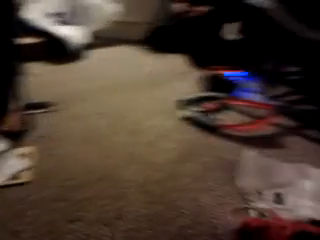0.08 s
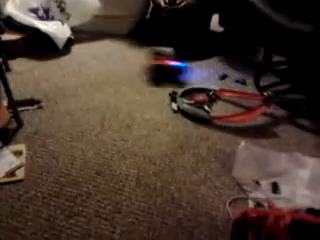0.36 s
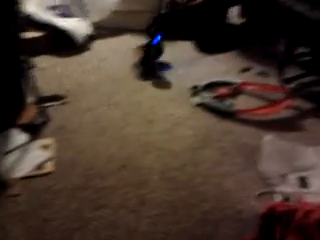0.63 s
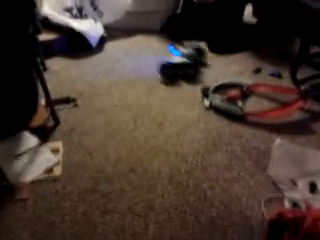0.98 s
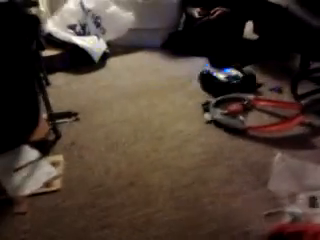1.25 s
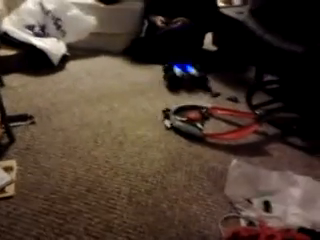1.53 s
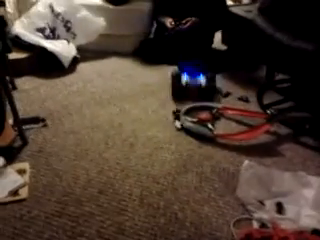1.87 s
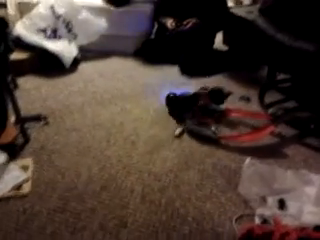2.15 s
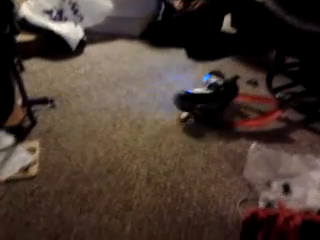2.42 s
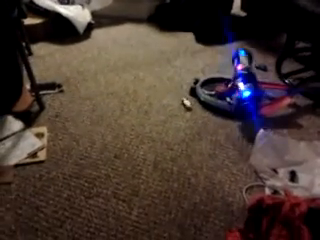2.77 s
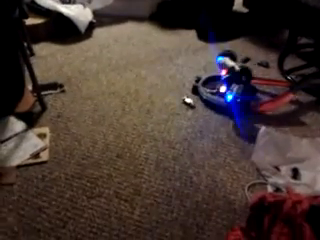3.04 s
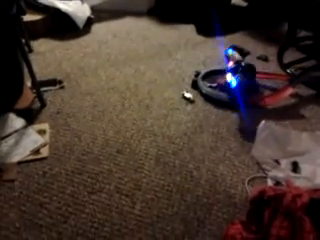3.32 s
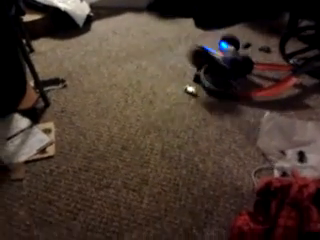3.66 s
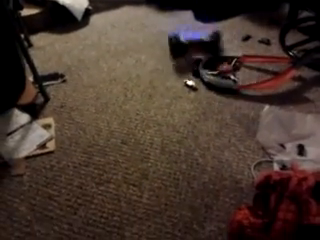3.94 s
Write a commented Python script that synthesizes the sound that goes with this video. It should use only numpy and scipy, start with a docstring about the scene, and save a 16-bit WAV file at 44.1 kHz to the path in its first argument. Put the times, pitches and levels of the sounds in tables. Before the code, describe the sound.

A toy car's motor whirs in bursts, then the car clatters against a bicycle part.

```python
"""A faint hum lies under a small room. A toy car darts about on the carpet, its motor whirring in
bursts: meshing plastic gears whine at their tooth rate, and teeth and loose parts drive the shell's
resonances. Now and then the wheels land with a thump. At 2.3 s the car strikes a bicycle part lying
on the floor and clatters over it, each impact setting the metal into damped free vibration.
To the end it keeps scrabbling against the part, with lighter clacks."""
import sys
import numpy as np
from scipy import signal
from scipy.fft import rfft, irfft
from scipy.io import wavfile
from scipy.ndimage import uniform_filter1d, minimum_filter1d

SR = 44100
rng = np.random.default_rng(int(sys.argv[2]) if len(sys.argv) > 2 else 0)


def persist_wave(psi):
    """Save psi, clipped to +-1, as 16-bit WAV."""
    counts = np.round(np.clip(psi, -1, 1) * 32767).astype(np.int16)
    wavfile.write(sys.argv[1], SR, np.atleast_2d(counts).T)


N = 176400

# Levels within each table are relative.
# spectrum of the room's air and hum: f/Hz, level/dB
AIR_SPECTRUM = [(20, -26), (46, -6), (57, 12.5), (70, -8), (195, 0), (300, -11), (1000, -12.5),
                (3000, -17.5), (15000, -35.5)]
# landings of the wheels on the carpet: t/s, level/dB
LANDINGS = [(.88, 1), (2.005, 2), (2.264, 2.5), (3.202, -1.5), (3.249, -6), (3.52, -3)]
# spectrum of a landing: f/Hz, level/dB
LANDING_SPECTRUM = [(50, -31), (160, 1), (260, -7.5), (370, 3), (550, -7.5), (850, 4), (1400, -17),
                    (4000, -61)]
# heavy blows of the car on the bicycle part: t/s, level/dB, chatter decay time/s
HEAVY_BLOWS = [(2.3115, 0, 0.0041), (2.318, -5.5, 0.0043), (2.3255, -6.5, 0.0048), (2.3305, -10.5, .006),
               (2.433, -14, 0.0034), (2.438, -2, 0.0059), (2.449, -3, 0.0032), (2.454, -4.5, 0.0043),
               (2.461, -4, 0.005), (2.566, -17, 0.0047), (2.573, -6.5, 0.017), (2.888, -23.5, 0.0064),
               (3.604, -20, 0.0072)]
# spectrum of a blow: f/Hz, level/dB
BLOW_SPECTRUM = [(80, -37.5), (362, -4.5), (497, -8.5), (758, 10.5), (1040, -2.5), (1180, 4.5), (2320, 5),
                 (3460, -10), (7730, -6.5), (15500, -30.5)]
# light clacks of plastic on metal: t/s, level/dB, chatter decay time/s
LIGHT_CLACKS = [(1.218, -15.5, 0.019), (2.378, 0, 0.031), (2.392, -1.5, 0.016), (2.707, -11.5, 0.017),
                (2.92, -8, 0.014), (3.03, -6, 0.017), (3.243, -7, 0.015), (3.266, -9.5, 0.0069),
                (3.324, -15.5, 0.028), (3.448, -8, 0.016), (3.516, -11.5, 0.0042), (3.591, -2, 0.015),
                (3.732, -7, 0.028), (3.798, -7.5, 0.023)]
# spectrum of a clack: f/Hz, level/dB
CLACK_SPECTRUM = [(150, -23), (350, -1), (600, -8.5), (1200, 2), (2200, 12), (3200, 0.5), (4800, 2),
                  (7500, -0.5), (10000, -9), (15000, -29.5)]
# drop of the car's body onto the part: t/s, level/dB, chatter decay time/s
BODY_DROP = [(2.446, 2, 0.0089)]
# normal modes of the bicycle part: f/Hz, level/dB, T60/s
METAL_MODES = [(375, -1, .14), (592, -6, .1), (700, -1, .06), (790, -3, .06), (979, -4, .1),
               (1215, -1, .11), (1358, -1, .12), (1523, -3, .11), (4830, -9, .12), (5920, -12, .12),
               (6865, -11, .14)]
# normal modes of the plastic shell: f/Hz, level/dB, T60/s
PLASTIC_MODES = [(1992, -1.5, 0.13), (2246, 4, 0.054), (2420, 11, 0.058)]
# broadband response of the shell: f/Hz, level/dB
SHELL_RESPONSE = [(200, -27), (380, -15), (560, -32.5), (820, -11.5), (1150, -6.5), (1500, -7.5),
                  (1900, -4.5), (2350, 1), (2950, -2.5), (3550, -4), (4800, -1), (5600, -7), (7400, -7.5),
                  (9500, -20.5), (12000, -34), (15500, -83)]
# tooth rate of the gears before flutter: t/s, f/Hz
MESH_RATE = [(.25, 652.5), (.32, 668), (.36, 803.6), (.405, 828.4), (.43, 931.6), (.48, 944), (.495, 650),
             (.525, 408.4), (.695, 425.8), (.72, 519.3), (.755, 749.6), (.8, 922), (.84, 748.5),
             (1.0, 762.6), (1.03, 912.4), (1.1, 921), (1.2, 626), (1.37, 415.7), (1.47, 490.4), (1.52, 610),
             (1.6, 700.6), (1.65, 434), (1.74, 469.4), (1.88, 640.8), (1.98, 819), (2.04, 721.3),
             (2.11, 990), (2.2, 776.4), (2.53, 736), (2.9, 634), (3.1, 541), (3.128, 720.8), (3.15, 1001),
             (3.178, 1040), (3.21, 747.6), (3.27, 980), (3.42, 500.3), (3.56, 695.8), (3.73, 589), (4, 780)]
# motor effort, as the strength of the whirr: t/s, level/dB
MOTOR_EFFORT = [(0, -33), (.08, -35.5), (.2, -33.5), (.33, -28.5), (.47, -26.5), (.52, -31), (.61, -48.5),
                (.71, -30), (.79, -25), (.9, -23.5), (.94, -27.5), (1.0, -24), (1.12, -24.5), (1.2, -34.5),
                (1.24, -29.5), (1.33, -41), (1.42, -33.5), (1.49, -33), (1.53, -28.5), (1.59, -27),
                (1.65, -32.5), (1.78, -31.5), (1.97, -24.5), (2.07, -24.5), (2.18, -22.5), (2.55, -22.5),
                (2.61, -22.5), (2.67, -28.5), (2.77, -35.5), (2.83, -25), (2.92, -27.5), (2.98, -40.5),
                (3.07, -32.5), (3.11, -30), (3.14, -23.5), (3.22, -26), (3.27, -26.5), (3.305, -39.5),
                (3.38, -28.5), (3.43, -31), (3.5, -27), (3.55, -27), (3.64, -25), (3.71, -29.5), (3.8, -21),
                (3.88, -25), (3.94, -23.5), (4, -21.5)]
# share of clean whine, high while the wheels run freely: t/s, level/dB
WHINE_SHARE = [(.17, -5), (.28, 5), (.47, 6), (.6, -8), (.7, 7), (.73, -7), (.8, -2), (.97, -2), (.997, 5),
               (1.02, -4), (1.45, -5.5), (1.55, 1), (1.65, -10), (1.85, -2), (1.98, 2), (2.06, -4),
               (2.45, -5), (2.53, 3), (2.62, -5), (3.08, -5), (3.16, 6), (3.23, -5)]
# response of the gearbox: f/Hz, level/dB
GEARBOX_RESPONSE = [(400, -39), (650, -10.5), (850, 3), (1100, -3), (1500, 1.5), (2100, 4), (2750, 4),
                    (3100, -11.5)]
# harmonics of the tooth rate, from the first up: level/dB
MESH_HARMONICS = [-4, 0, -1, -6]


def undb(db):
    """Amplitude grows tenfold for every 20 dB."""
    return 10 ** (np.asarray(db) / 20)


def unit(x):
    """Normalisation to rms 1."""
    return x / np.sqrt(np.mean(x ** 2))


def curve(rows):
    """Linear interpolation of (t/s, value) rows."""
    return np.interp(np.arange(N) / SR, *np.array(rows).T)


def walk(rate):
    """Low-pass random fluctuation of rms 1, with `rate` new values a second."""
    step = max(int(SR / rate), 2)
    jagged = np.interp(np.arange(N) / step, np.arange(N), rng.standard_normal(N))
    return unit(uniform_filter1d(jagged, step))


def through(x, response):
    """Convolution with an impulse response scaled to unit energy."""
    return signal.fftconvolve(x, response / np.sqrt(np.sum(response ** 2)))[:N]


def colour(spectrum, size=2048):
    """Minimum-phase impulse response of (f/Hz, level/dB) rows, by folding the cepstrum."""
    hz, db = np.array(spectrum).T
    freqs = np.maximum(np.fft.rfftfreq(size, 1 / SR), 1)
    magnitude = undb(np.interp(np.log(freqs), np.log(hz), db))
    cepstrum = irfft(np.log(magnitude))
    cepstrum[1:size // 2] *= 2
    cepstrum[size // 2 + 1:] = 0
    return irfft(np.exp(rfft(cepstrum)))


def ring(modes):
    """Free vibration is a sum of damped modes; neighbours swing opposite ways."""
    t = np.arange(SR // 2) / SR
    return sum((-1) ** k * undb(db) * np.sin(2 * np.pi * hz * t) * np.exp(-np.log(1000) * t / t60)
               for k, (hz, db, t60) in enumerate(modes))


def clicks(per_s, spread_db):
    """A Poisson train of uneven impulses, rms 1."""
    chance, size, sign = rng.random(N), rng.standard_normal(N), rng.choice([-1, 1], N)
    return unit((chance < per_s / SR) * sign * undb(spread_db * np.clip(size, -2, 2)))


def contacts(rows, per_s, rise_s=.0007):
    """Contact chatter: each impact is a burst of small hits that decays exponentially."""
    t, force = np.arange(N) / SR, np.zeros(N)
    chatter = clicks(per_s, spread_db=.5)
    for start, db, decay_s in rows:
        i = int(start * SR)
        age = t[:N - i]
        burst = chatter[i:] * np.exp(-age / decay_s) * (1 - np.exp(-age / rise_s))
        force[i:] += undb(db + 5.5) * burst / (np.sqrt(np.sum(burst ** 2)) + 1e-9)
    return force


def background():
    """Stationary noise of the room air; a narrow spectral peak at 57 Hz is heard as hum."""
    return undb(-51) * through(rng.standard_normal(N), colour(AIR_SPECTRUM, size=8192))


def room(direct, t60_s=.3, delay_s=.0032):
    """Reverberation: dense reflections die quickly in a cluttered, carpeted room."""
    t = np.arange(SR // 2) / SR
    tail = rng.standard_normal(len(t)) * np.exp(-np.log(1000) * t / t60_s) * (t > delay_s)
    return direct + undb(-9) * through(direct, tail)


def wheel_thumps(decay_s=.025):
    """Cushioned impact: wheels landing on carpet give little treble."""
    force = contacts([(start, db, decay_s) for start, db in LANDINGS], per_s=460)
    return undb(-11.5) * through(force, colour(LANDING_SPECTRUM))


def body_knock():
    """Modal response: the car's weight drops on the part and booms in its two lowest modes."""
    return through(contacts(BODY_DROP, per_s=2200), ring(METAL_MODES[:2]))


def collisions():
    """Impulsive excitation: blows and clacks sound the shell and ring the bicycle part."""
    blows = undb(15) * contacts(HEAVY_BLOWS, per_s=2500)
    clacks = undb(5.5) * contacts(LIGHT_CLACKS, per_s=4500)
    shell = through(blows, colour(BLOW_SPECTRUM)) + through(clacks, colour(CLACK_SPECTRUM))
    metal = through(undb(-13) * blows + undb(-27) * clacks, ring(METAL_MODES))
    return shell + metal


def flexing_shell(force, drift=.04):
    """Forced resonance: the shell's modes drift in pitch as the body flexes and tumbles."""
    motion = 0
    for hz, db, t60 in PLASTIC_MODES:
        mode_hz = hz * (1 + drift * walk(20))
        phasor = np.exp(2j * np.pi * np.cumsum(mode_hz) / SR)
        pole = np.exp(-np.log(1000) / (t60 * SR))
        motion += undb(db) * np.imag(phasor * signal.lfilter([1], [1, -pole], force / phasor))
    return unit(motion) * np.std(force)


def gear_grind(mesh_cycles, tooth_spread_db=3, flicker_db=2.5):
    """Structure-borne sound: uneven teeth tick and rasp, loose parts rattle, and the shell radiates."""
    tooth_onsets = np.diff(np.floor(mesh_cycles), prepend=0)
    tooth_error = undb(tooth_spread_db * np.clip(rng.standard_normal(N), -2, 2)) - 1
    ticks = unit(tooth_onsets * tooth_error)
    tooth_decay = np.exp(-(mesh_cycles % 1) / .74)
    rasp = unit(rng.standard_normal(N) * tooth_decay) * undb(flicker_db * walk(120))
    rattle = clicks(per_s=300, spread_db=2)
    force = undb(-9) * ticks + undb(-4.5) * rasp + undb(-12) * rattle
    ringing = undb(-7 + flicker_db * walk(50)) * flexing_shell(force)
    return through(force, colour(SHELL_RESPONSE)) + ringing


def gear_whine(mesh_hz, mesh_cycles, pinion_teeth=8):
    """Modulation: an off-centre pinion and a loose mesh put sidebands on the tooth-rate harmonics."""
    gearbox_hz, gearbox_db = np.array(GEARBOX_RESPONSE).T
    tone = 0
    for k, db in enumerate(MESH_HARMONICS, 1):
        gain = undb(np.interp(k * mesh_hz, gearbox_hz, gearbox_db) + db)
        wobble = 1 + .35 * np.sin(2 * np.pi * (mesh_cycles / pinion_teeth + rng.random()))
        slack = 1 + .45 * (walk(170) + 1j * walk(170))
        tone += gain * wobble * np.imag(slack * np.exp(2j * np.pi * k * mesh_cycles))
    return unit(tone)


def gear_drive(treble_hz=3960):
    """Gear meshing is a periodic excitation: speed sets the pitch, effort the level and brightness."""
    effort_db, free_db = curve(MOTOR_EFFORT), curve(WHINE_SHARE)
    flutter = .014 * undb(-free_db) * walk(55)  # hindered wheels run less evenly
    mesh_hz = curve(MESH_RATE) * (1 + flutter)
    mesh_cycles = np.cumsum(mesh_hz) / SR
    grind = gear_grind(mesh_cycles)
    surge_db = 3 * walk(32)  # the wheels catch and slip
    whirr = grind + undb(-6.5 + free_db + surge_db) * gear_whine(mesh_hz, mesh_cycles)
    treble = signal.sosfilt(signal.butter(1, treble_hz, "high", fs=SR, output="sos"), whirr)
    treble_gain = undb(1.18 * (effort_db + 25))  # the treble grows faster than the effort
    return (whirr + treble * (treble_gain - 1)) * undb(effort_db)


def scene():
    """Superposition: the car and its impacts reverberate over the hum, in one channel."""
    car = gear_drive() + collisions() + body_knock() + wheel_thumps()
    return (room(car) + background())[None]


def record(dry, ceiling=.73, window_s=.001, cutoff_hz=15600):
    """Peak limiting holds down the loudest blows; a steep low-pass filter bounds the band."""
    span = int(window_s * SR)
    needed_gain = ceiling / np.maximum(np.abs(dry), ceiling)
    gain = uniform_filter1d(minimum_filter1d(needed_gain, span), span)
    return signal.sosfilt(signal.ellip(10, .2, 80, cutoff_hz, fs=SR, output="sos"), dry * gain)


dry = scene()
out = record(dry)
persist_wave(out)
```